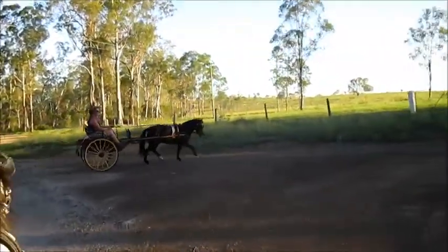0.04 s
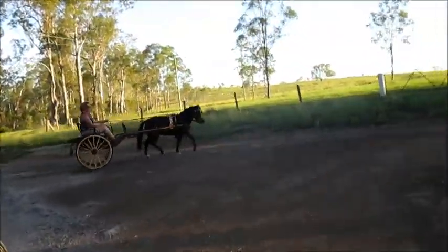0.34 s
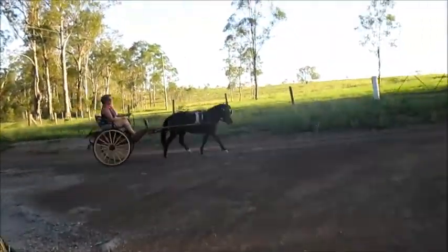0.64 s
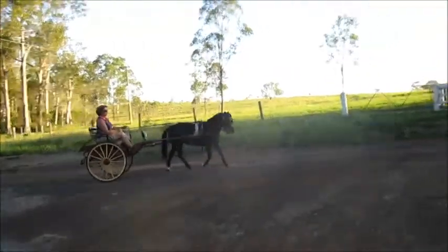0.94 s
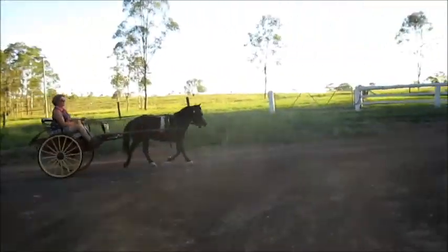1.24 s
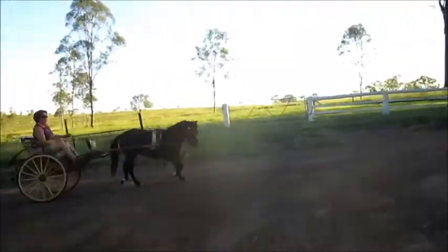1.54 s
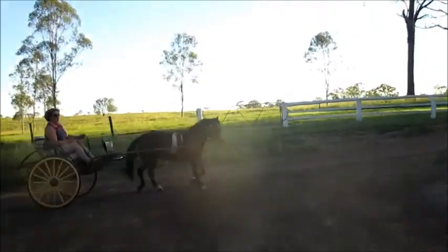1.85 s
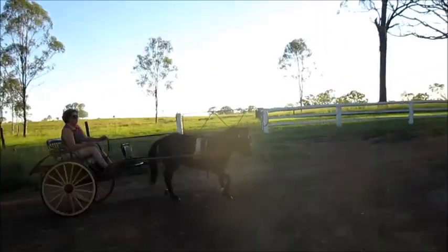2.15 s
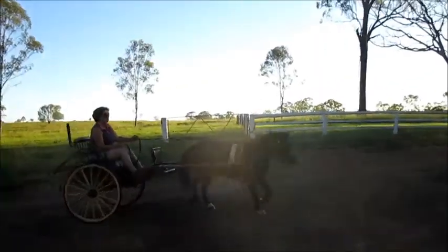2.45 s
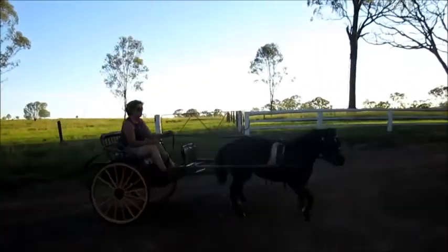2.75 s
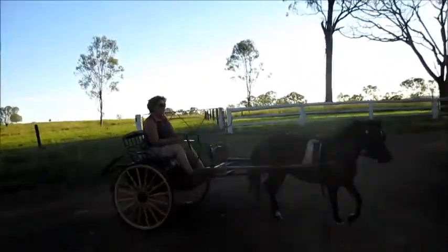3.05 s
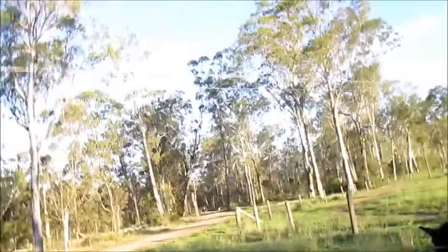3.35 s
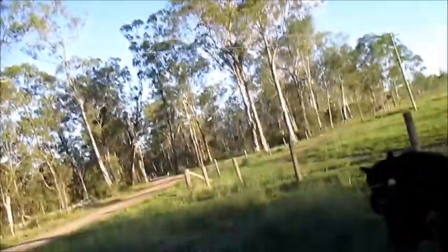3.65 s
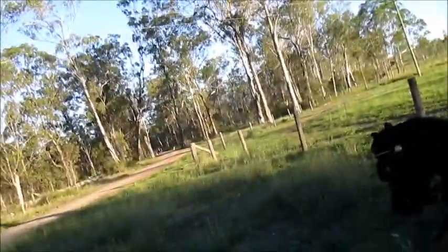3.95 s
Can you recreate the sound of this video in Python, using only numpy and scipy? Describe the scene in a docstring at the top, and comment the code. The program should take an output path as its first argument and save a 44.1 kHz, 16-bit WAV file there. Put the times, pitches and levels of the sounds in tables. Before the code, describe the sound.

A pony cart rattles past on a dirt road, with hoof thuds, wooden knocks, clinking chains and crunching grit, while wind buffets the microphone. After a brief dropout, quiet outdoor air follows with a few close scuffs and clacks.

```python
"""A pony trots past on a dirt road with a two-wheeled cart. From the start, wind buffets the microphone,
jolts set the wooden body drumming and the wheels crush grit. Hooves thud, stones and wood clack,
iron fittings and trace chains ring in their natural modes, and single bits of gravel crack.
After about three seconds the sound drops out for a moment. It returns to a quiet paddock:
soft air, a faint high whine, and a few scuffs and clacks close by."""
import sys
import numpy as np
from scipy import signal
from scipy.io import wavfile
from scipy.ndimage import uniform_filter1d

SR = 44100
rng = np.random.default_rng(int(sys.argv[2]) if len(sys.argv) > 2 else 0)


def digitize_waveform(pressure):
    """Quantize a signal to 16-bit integers and store it at the path in sys.argv[1].

    Rows of a 2-D input are taken as channels; values are limited to [-1, 1].
    """
    field = np.atleast_2d(pressure).T
    bounded = np.clip(field, -1, 1)
    quanta = np.round(bounded * 32767).astype(np.int16)
    wavfile.write(sys.argv[1], SR, quanta)


N = 176400
TIME = np.arange(N) / SR
HIT = TIME[:SR // 4]  # time axis of one impact, t/s


def amp(db):
    """Amplitude ratio of a level in decibels."""
    return 10 ** (np.asarray(db) / 20)


def unit(x):
    """Normalisation to rms 1."""
    return x / np.sqrt(np.mean(x ** 2) + 1e-20)


def unit_hit(x):
    """Normalisation of a transient to rms 1 over its loudest 10 ms."""
    return x / np.sqrt(uniform_filter1d(x ** 2, SR // 100).max() + 1e-20)


def envelope(points):
    """Gain interpolated in decibels between (t/s, level/dB) points."""
    return amp(np.interp(TIME, *np.transpose(points)))


def add(mix, start, sound):
    """Superposition of a sound on the mix from a start time in seconds."""
    part = mix[max(round(start * SR), 0):][:len(sound)]
    part += sound[:len(part)]


def colour(x, points, size=4096):
    """Minimum-phase filtering through (f/Hz, level/dB) points."""
    hz, db = np.transpose(points)
    bin_hz = abs(np.fft.fftfreq(size, 1 / SR))
    log_gain = np.log(amp(np.interp(np.log(bin_hz + 1), np.log(hz), db)))
    taps = np.fft.ifft(np.exp(signal.hilbert(log_gain).conj())).real
    return signal.fftconvolve(x, taps[:size // 2])[:len(x)]


def ring(force, modes):
    """Forced response: convolution with damped modes (f/Hz, level/dB, T60/s)."""
    response = sum(amp(db - 60 * HIT / t60) * np.sin(2 * np.pi * hz * HIT) for hz, db, t60 in modes)
    return signal.fftconvolve(force, response)[:len(force)]


def grains(n, per_s, spread_db):
    """Shot noise: a Poisson train of impulses of uneven size."""
    size = amp(spread_db * np.minimum(rng.exponential(1, n), 4))
    return size * rng.choice([-1, 1], n) * (rng.random(n) < per_s / SR)


def flutter(per_s, depth_db):
    """Random amplitude modulation: a gain that follows smoothed noise."""
    width = max(int(SR / per_s), 2)
    drift = uniform_filter1d(uniform_filter1d(rng.standard_normal(N), width), width)
    return amp(depth_db * unit(drift))


def burst(rise, hold, t60):
    """Linear rise, then exponential decay from the end of the hold; times in seconds."""
    return np.minimum(HIT / rise, 1) * amp(-60 * np.maximum(HIT - hold, 0) / t60)


# Strength of the turbulence: t/s, level/dB
WIND_LEVEL = [(0, -28), (.55, -36.5), (.7, -28.5), (.86, -42), (.97, -31), (1.09, -44), (1.39, -26),
              (1.55, -34.5), (1.8, -32), (2.1, -42), (2.38, -31), (2.6, -44)]
# Spectrum of the turbulence: f/Hz, level/dB
WIND_SPECTRUM = [(10, -25.5), (30, -1), (65, -1), (120, -4.5), (250, -12.5), (800, -30), (3000, -74.5)]
# Single buffets: t/s, level/dB, f/Hz
BUFFETS = [(0.932, -16.5, 99), (1.357, -23, 109), (1.406, -29, 70), (1.651, -18, 86.5), (1.75, -19, 69.4),
           (1.81, -24.5, 75.4)]
def wind():
    """Turbulent pressure at the microphone: a low rumble, with buffets about one cycle long."""
    turbulence = colour(rng.standard_normal(N), WIND_SPECTRUM) * flutter(25, depth_db=1.8)
    out = envelope(WIND_LEVEL) * unit(turbulence)
    for t, db, hz in BUFFETS:
        cycles = (HIT - HIT.mean()) * hz
        buffet = np.exp(-(cycles / 0.59) ** 2) * np.sin(2 * np.pi * (cycles + rng.random()))
        add(out, t - HIT.mean(), amp(db) * buffet)
    return out


# Strength of the drumming: t/s, level/dB
BODY_LEVEL = [(0, -28), (.16, -32.5), (.29, -35), (.38, -26), (.5, -36.5), (.67, -34.5), (.84, -40),
              (.94, -25), (1.11, -36.5), (1.27, -29), (1.49, -41.5), (1.63, -25.5), (1.73, -42),
              (1.97, -36), (2.04, -37), (2.18, -36), (2.23, -30), (2.38, -36.5), (2.49, -33.5),
              (2.75, -38.5), (2.96, -30.5), (3.06, -35)]
# Broad response of the wooden body: f/Hz, level/dB
BODY_SPECTRUM = [(60, -29), (160, 8), (280, -3), (500, -1.5), (720, -7), (930, -6), (1500, -24.5),
                 (6000, -37.5), (14000, -70.5)]
# Its natural modes: f/Hz, level/dB, T60/s
BODY_MODES = [(158, 0, .3), (231, -3, .25), (362, -1, .15), (455, -3, .15), (520, -3, .15), (888, -5, .13),
              (955, -7, .12)]
def cart_body():
    """Forced vibration: jolts from ruts and pebbles keep the wooden body drumming."""
    jolts = grains(N, 1000, spread_db=1.8) * flutter(50, depth_db=1.8)
    drumming = unit(colour(jolts, BODY_SPECTRUM)) + amp(-8.5) * unit(ring(jolts, BODY_MODES))
    return envelope(BODY_LEVEL) * drumming


def stones(low_hz=2000, high_hz=5940, count=24, per_s=77, db_per_octave=-12.5):
    """Impact excitation: flicked stones in each pitch band ring four shared modes with a cluster of cracks."""
    out = np.zeros(N)
    for hz in np.geomspace(low_hz, high_hz, count):
        hits = grains(N, per_s / count, spread_db=3.5)
        cracks = grains(len(HIT), 4000, spread_db=3) * burst(.0003, .001, t60=.016)
        modes = [(hz * ratio, 0, .014) for ratio in rng.uniform(.6, 1.5, 4)]
        tick = unit_hit(ring(cracks, modes))[:SR // 20]
        out += amp(db_per_octave * np.log2(hz / low_hz)) * signal.oaconvolve(hits, tick)[:N]
    return unit(out)


# Strength of the crunch under the wheels: t/s, level/dB
GRIT_LEVEL = [(0, -40), (.14, -44), (.38, -39), (.52, -46.5), (.85, -45.5), (1.0, -44.5), (1.52, -44.5),
              (1.62, -38.5), (1.7, -45), (1.85, -44), (2.05, -46), (2.28, -39.5), (2.38, -47), (2.48, -41),
              (2.65, -45.5), (3.06, -46.5)]
# Spectrum of cracking grit: f/Hz, level/dB
GRIT_SPECTRUM = [(300, -10.5), (1550, 6), (2000, -6), (3000, 4.5), (6500, -14.5), (12000, -29.5),
                 (15500, -35.5)]
def wheels():
    """Shot noise: the rims crack clumps of grit and flick stones, and the impulses merge to a crunch."""
    grit = grains(N, 3000, spread_db=3.5) * flutter(130, depth_db=3.5)
    return envelope(GRIT_LEVEL) * (amp(1.5) * unit(colour(grit, GRIT_SPECTRUM)) + amp(-4.5) * stones())


# Dull blows of hooves and cart body, the last row a short low ring of the iron hoop struck at 2.955 s: t/s,
# relative level/dB, f/Hz
THUDS = [(.002, -25.5, 627), (.323, -20, 329), (0.369, -16, 920), (.661, -22, 351), (0.861, -19.5, 506),
         (.997, -20.5, 350), (1.135, -8.5, 364.5), (1.252, -28, 468), (1.424, -19.5, 365),
         (1.523, -22.5, 522), (1.598, -18, 399), (1.917, -24, 448), (2.199, -17.5, 380), (2.249, -37, 525),
         (2.419, -21.5, 458), (2.87, -19, 367), (2.968, -19, 897)]
# Modes of a blow: frequency ratio, level/dB, T60/s
THUD_MODES = [(1, 0, .065), (1.3, -11, .08), (.6, -15, .1)]
# Spectrum of the shoved dirt: f/Hz, level/dB
DIRT_SPECTRUM = [(60, -6), (200, 5), (420, 7), (1100, -5), (1800, -30), (8000, -94)]
def thuds(hold_s=.015, gain_db=-6):
    """Damped free vibration: each blow rings a few low modes and shoves the dirt in a burst of noise."""
    out = np.zeros(N)
    decay_time = np.maximum(HIT - hold_s, 0)
    attack = np.minimum(HIT / 0.00145, 1)
    for t, db, hz in THUDS:
        modes = sum(amp(mode_db - 60 * decay_time / t60)
                    * np.sin(2 * np.pi * (hz * ratio * HIT + rng.random()))
                    for ratio, mode_db, t60 in THUD_MODES)
        dirt = colour(rng.standard_normal(len(HIT)) * burst(0.002, hold_s, t60=.075), DIRT_SPECTRUM)
        thud = unit_hit(modes * attack) + amp(-0.5) * unit_hit(dirt)
        add(out, t, amp(db + gain_db) * unit_hit(thud))
    return out


# Clacks of stones and wood: t/s, knock level/dB, centre f/Hz, width/octaves, crack re knock/dB
CLACKS = [(0.0946, -5, 970, 1, -8), (.399, -15, 1740, 0.51, -38), (0.632, -16.5, 1620, 0.62, -22),
          (0.719, -4, 1430, 0.91, -5), (0.813, -30, 1800, 0.45, -8), (1.089, -16.5, 2100, 0.62, -24),
          (1.349, -28, 1010, 0.24, -21), (1.885, -15, 1044, 0.29, -42), (2.249, -27, 700, 0.98, 2.5),
          (2.681, -15, 2500, 0.86, -15), (2.934, -17, 1100, 0.41, -14.5), (3.745, -21.5, 1660, 0.73, -28),
          (3.764, -22, 650, 0.99, -24), (3.859, -34.5, 3520, 0.48, -19), (3.928, -26, 1050, 0.33, -1),
          (3.933, -23.5, 5960, 0.69, -10)]
# Spectrum of the bright crack: f/Hz, level/dB
CRACK_SPECTRUM = [(300, -30.5), (2000, -0.5), (5500, 4), (11000, -16.5), (16000, -31)]
def clacks(contact_t60=0.016, scatter_t60=0.16):
    """Impulse response: a hard contact and its scatter excite a broad resonance and a bright crack."""
    out = np.zeros(N)
    decay = amp(-60 * HIT / contact_t60) + amp(-17 - 60 * HIT / scatter_t60)
    for t, db, hz, octaves, crack_db in CLACKS:
        force = rng.standard_normal(len(HIT)) * decay
        force[0] = 7  # the first contact
        resonance = [(hz * 2 ** (k * octaves), -abs(k) ** 1.69 * 5) for k in range(-4, 5)]
        knock = colour(force, resonance)
        crack = colour(force, CRACK_SPECTRUM)
        add(out, t, amp(db) * (knock / abs(knock).max() + amp(crack_db) * crack / abs(crack).max()))
    return out


METAL_RISE_S, METAL_HOLD_S = 0.0025, 0.0053
def metal_clash(spectrum):
    """Repeated collision: a quick cluster of metal contacts gives broadband noise."""
    contacts = grains(len(HIT), per_s=3200, spread_db=0.5) * burst(METAL_RISE_S, METAL_HOLD_S, t60=0.1)
    return unit_hit(colour(contacts, spectrum))


def metal_ring(modes, pitch, t60):
    """Modal vibration: partials (f/Hz, level/dB) of struck metal hold briefly, then decay."""
    partials = sum(amp(db) * np.sin(2 * np.pi * (hz * pitch * HIT + rng.random())) for hz, db in modes)
    return unit_hit(partials * burst(METAL_RISE_S, METAL_HOLD_S, t60))


# Clanks: t/s, level/dB of clash, hoop, buckle and clip, frequency ratio of hoop and buckle
CLANKS = [(.099, -43, -44, -49.5, -48, 1.1), (1.035, -31.5, -49.5, -40, -35, 1.3),
          (1.291, -31.5, -38, -31.5, -38, 1.2), (2.604, -36, -27.5, -34.5, -38.5, 1.05),
          (2.784, -37, -44.5, -32.5, -49, 1.04), (2.861, -40.5, -33, -42, -51, 1.0),
          (2.955, -27.5, -20.5, -34, -27, 1.0)]
# Spectrum of the clash: f/Hz, level/dB
IRON_CLASH = [(300, -39.5), (2700, 3), (6000, -6), (8000, -17.5), (15000, -32)]
# Modes of the three fittings, before any frequency ratio: f/Hz, level/dB
HOOP_MODES = [(888, 0), (960, -10), (1152, -17), (1491, -19)]
BUCKLE_MODES = [(2200, 0.5), (2500, 3), (2860, -4.5)]
CLIP_MODES = [(3930, -10), (4400, -8), (4850, -7), (5440, -4), (6250, 0), (6503, -8), (7400, -15),
              (8040, -17), (8680, -20), (9850, -24)]
def iron_fittings():
    """Free vibration after a collision: a low hoop, a buckle and a bright clip clash and ring on."""
    out = np.zeros(N)
    for t, clash_db, hoop_db, buckle_db, clip_db, pitch in CLANKS:
        add(out, t, amp(clash_db) * metal_clash(IRON_CLASH))
        add(out, t, amp(hoop_db) * metal_ring(HOOP_MODES, pitch, t60=.19))
        add(out, t, amp(buckle_db) * metal_ring(BUCKLE_MODES, pitch, t60=.13))
        add(out, t, amp(clip_db) * metal_ring(CLIP_MODES, 1, t60=.095))
    return out


# Shakes of the trace chains: t/s, level/dB
CHAIN_SHAKES = [(0.158, -36.5), (.181, -29), (0.2524, -16), (0.335, -21.5), (.431, -34), (0.481, -34),
                (0.531, -33.5), (0.568, -39), (0.673, -33.5), (1.6, -34), (1.835, -37.5), (1.965, -35.5),
                (2.104, -36.5), (2.247, -34), (2.413, -37), (2.452, -30), (2.482, -33), (2.834, -36)]
# Modes of the links: nominal f/Hz, level/dB
LINK_MODES = [(1560, -10), (2100, -10), (2370, -7), (2654, -4), (3125, 3), (3470, -8), (4440, -3),
              (5000, -7)]
# Spectrum of colliding links: f/Hz, level/dB
CHAIN_CLASH = [(300, -6), (1200, -1), (2500, -1), (4500, -4), (9000, -19.5), (15000, -41)]
def chains(full_ring_db=-18):
    """Collisions excite inharmonic modes of the links: hard shakes ring, light ones stay dry."""
    out = np.zeros(N)
    for t, db in CHAIN_SHAKES:
        softer_db = max(full_ring_db - db, 0)
        pitch = 1 + .004 * softer_db * rng.uniform(-1, 1)  # light shakes each strike other links
        links = amp(-.5 * softer_db) * metal_ring(LINK_MODES, pitch, t60=0.077)
        add(out, t, amp(db) * unit_hit(metal_clash(CHAIN_CLASH) + links))
    return out


# Single bits of gravel cracking: t/s, peak level/dB, centre f/Hz
GRAVEL_CRACKS = [(0.64, -29, 2200), (1.081, -32.5, 3730), (1.453, -26, 3130), (1.5, -34, 4340),
                 (1.58, -30, 2650), (1.625, -32, 3300), (1.638, -25.5, 4600), (1.649, -24, 3800),
                 (1.989, -38, 5950), (2, -31, 3350), (2.129, -25, 3470), (2.327, -33.5, 4460),
                 (2.394, -41, 3500), (2.739, -34, 8000)]
def gravel(t60=0.019, skirt_db=9.5):
    """Brittle fracture: gravel under a rim or hoof gives a short, bright burst of band-limited noise."""
    out = np.zeros(N)
    for t, db, hz in GRAVEL_CRACKS:
        force = rng.standard_normal(len(HIT)) * amp(-60 * HIT / t60)
        tick = colour(force, [(hz * 2. ** k, -skirt_db * k * k) for k in range(-2, 3)])
        add(out, t, amp(db) * tick / abs(tick).max())
    return out


# Spectrum of the open air: f/Hz, level/dB
AIR_SPECTRUM = [(25, 1), (87, -2), (330, -13), (1200, -10), (2100, -19), (7500, -31), (9000, -40),
                (16000, -48)]
# Scuffs close by: t/s, hold/s, level/dB
SCUFFS = [(3.395, 0.034, -38.5), (3.437, 0.046, -43.5), (3.62, 0.03, -45.5), (3.761, 0.03, -33.5),
          (3.926, 0.015, -32)]
# Spectrum of a scuff: f/Hz, level/dB
SCUFF_SPECTRUM = [(100, -2), (1100, 1.5), (2200, -6.5), (4500, -5), (7500, -15), (15000, -38)]
def paddock(whine_hz=11900):
    """Ambient noise of open air with a faint pure tone; gritty scuffs are bursts of shot noise."""
    air = colour(rng.standard_normal(N), AIR_SPECTRUM) * flutter(53, depth_db=2.5)
    whine = np.sin(2 * np.pi * whine_hz * TIME)
    out = amp(-46.5) * unit(air) + amp(-78) * whine
    for t, hold, db in SCUFFS:
        grit = grains(len(HIT), 5000, spread_db=4.0) * burst(0.0016, hold, t60=0.047)
        add(out, t, amp(db) * unit_hit(colour(grit, SCUFF_SPECTRUM)))
    return out


STOP_S, RESUME_S = 3.066, 3.397
def scene():
    """Superposition of sources: first the passing cart, then the paddock, with clacks in both."""
    passing = thuds() + chains() + iron_fittings() + gravel() + cart_body() + wheels() + wind()
    return (np.where(TIME < STOP_S, passing, paddock()) + clacks())[None]


def record(dry):
    """Gating leaves a silent gap between the two scenes; a low-pass filter limits the bandwidth."""
    gate = (TIME < STOP_S) | (TIME > RESUME_S)
    low_pass = signal.firwin(401, cutoff=16200, window=("kaiser", 8), fs=SR)
    return signal.oaconvolve(dry * gate, low_pass[None], "same")


dry = scene()
out = record(dry)
digitize_waveform(out)
```